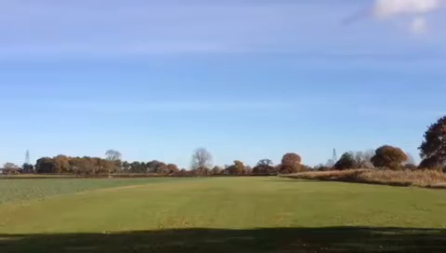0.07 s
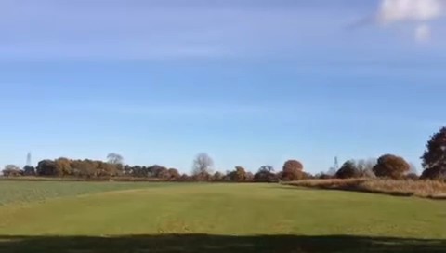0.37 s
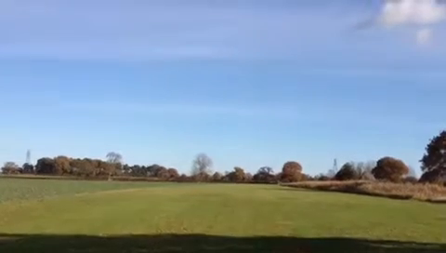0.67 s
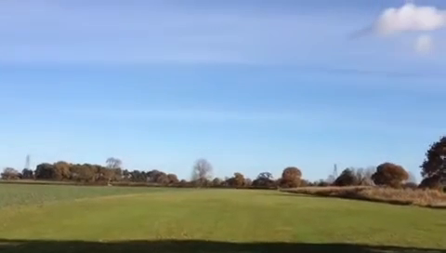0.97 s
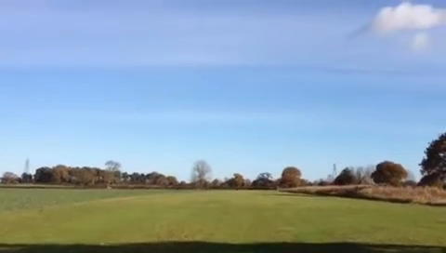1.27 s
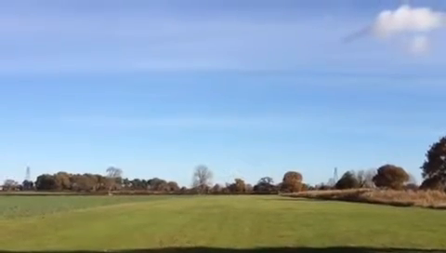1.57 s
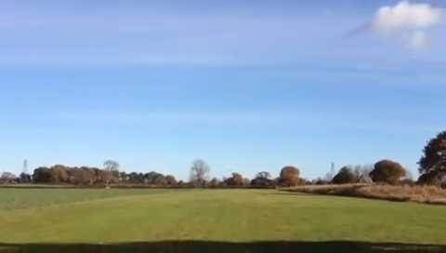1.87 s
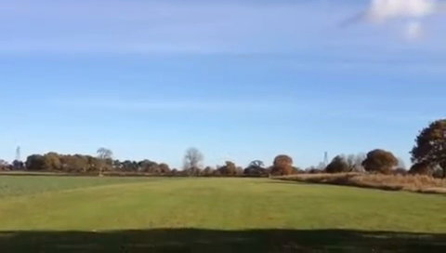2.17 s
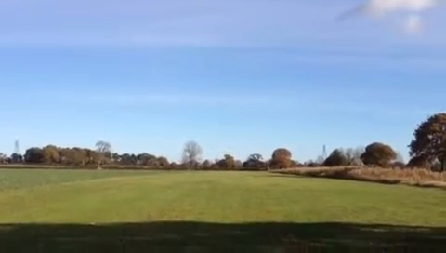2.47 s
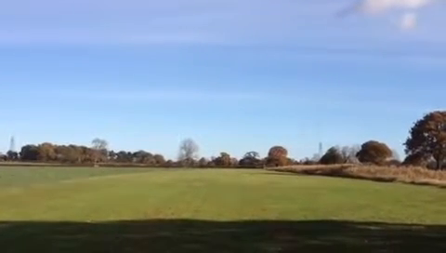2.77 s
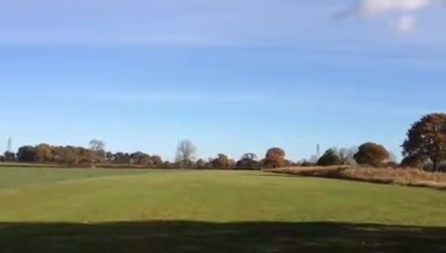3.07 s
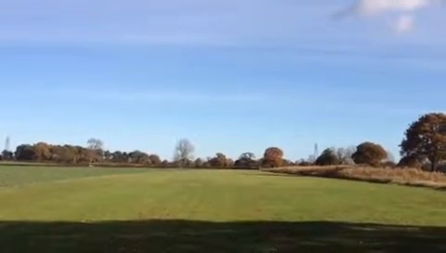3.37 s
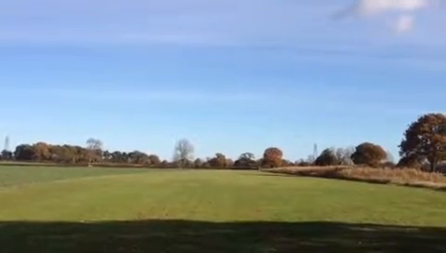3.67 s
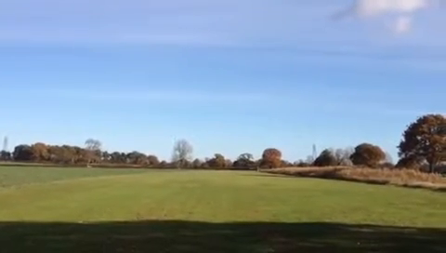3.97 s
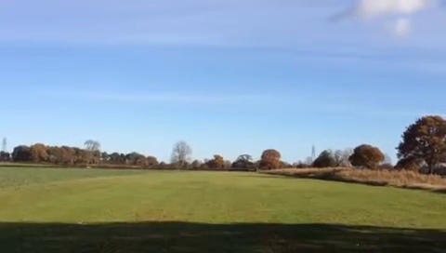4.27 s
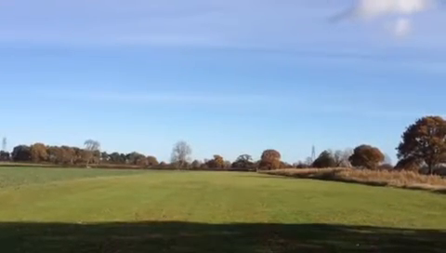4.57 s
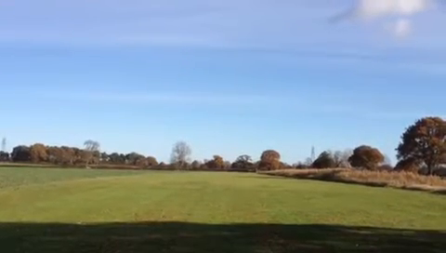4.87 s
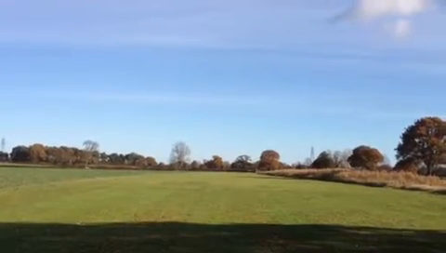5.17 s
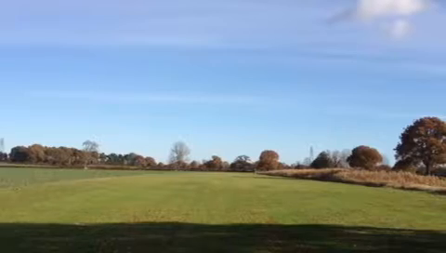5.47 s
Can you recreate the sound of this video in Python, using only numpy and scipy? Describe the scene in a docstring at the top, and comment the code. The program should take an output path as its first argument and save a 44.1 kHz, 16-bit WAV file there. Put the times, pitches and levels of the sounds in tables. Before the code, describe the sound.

A soft whoosh of air, a bright hiss over a lower rush, swells close by and peaks at about 0.5 seconds, just after a faint thin whistle. As it fades, wind starts striking the microphone with a low, sputtering rumble and irregular thumps. The buffeting is the loudest sound, strongest from 1.2 to 1.5 seconds, and carries on in uneven gusts until about 3.3 seconds. After a lull, another gust comes from 3.9 to 4.4 seconds, then only small puffs near 5 and 5.4 seconds.

Behind this, distant tyre noise fades across the open field over the first two seconds and builds again to a peak near 5.4 seconds. A few tiny handling ticks fall between 0.9 and 3 seconds. Very faint breezy whistles come around 2.3 and 4.2 seconds, the latter with a slight rustle of dry leaves. A quiet, steady microphone hiss lies underneath.

```python
"""Whoosh over a windy field

A soft whoosh of air swells close by and fades, perhaps a model glider going past. Gusts rumble on the
microphone and their eddies strike it in low thumps. Far off, tyre roar dies away and builds again.
Thin whistles, rustling leaves, faint handling ticks and the microphone's own hiss lie underneath."""
import sys
import numpy as np
from scipy import signal
from scipy.fft import rfft, irfft
from scipy.io import wavfile
from scipy.ndimage import uniform_filter1d, map_coordinates

SR = 44100
rng = np.random.default_rng(int(sys.argv[2]) if len(sys.argv) > 2 else 0)


def persist_wave(psi):
    """Save psi, clipped to +-1, as 16-bit WAV."""
    counts = np.round(np.clip(psi, -1, 1) * 32767).astype(np.int16)
    wavfile.write(sys.argv[1], SR, np.atleast_2d(counts).T)


N = 243873
TIME = np.arange(N) / SR


def undb(db):
    """Decibels to gain."""
    return 10 ** (np.asarray(db) / 20)


def unit(x):
    """Scale to rms 1."""
    return x / np.sqrt(np.mean(x ** 2))


def noise(spectrum):
    """Noise of rms 1 with the colour of (Hz, dB) points."""
    hz, db = np.transpose(spectrum)
    f = np.maximum(np.arange(N // 2 + 1) * SR / N, 1)
    # the spectrum falls away beyond its first and last points
    skirts = np.minimum(f / hz[0], 1) ** 2 * np.minimum(hz[-1] / f, 1) ** 2
    tilt = undb(np.interp(np.log(f), np.log(hz), db))
    return unit(irfft(rfft(rng.standard_normal(N)) * skirts * tilt, N))


def wavering_gain(depth_db, rate_hz):
    """An unsteady level: random steps, smoothed twice."""
    hold = int(SR / rate_hz)
    steps = np.repeat(rng.standard_normal(N // hold + 1), hold)
    slewed = uniform_filter1d(uniform_filter1d(steps, hold), hold)
    return undb(depth_db * unit(slewed[:N]))


def airy_band(hz, width_hz):
    """A hollow, breathy band: a tone spread by its wandering level and phase."""
    slew = signal.butter(2, width_hz / 2, fs=SR, output="sos")
    wander = signal.sosfilt(slew, rng.standard_normal(N) + 1j * rng.standard_normal(N))
    return unit(np.real(wander * np.exp(2j * np.pi * hz * TIME)))


def passing(closest_s, db, approach_s, retreat_s, power):
    """Gain of something going by in a straight line: it falls with a power of the distance."""
    along = (TIME - closest_s) / np.where(TIME < closest_s, approach_s, retreat_s)
    return undb(db) / np.hypot(1, along) ** power


def swells(rows):
    """Airy bands that each rise and fade once."""
    return sum(airy_band(hz, width) * passing(s, db, half, half, power=1.7)
               for s, db, half, hz, width in rows)


def add(out, sound, s):
    """Mix a short sound in from time s."""
    i = max(int(s * SR), 0)
    out[i:i + len(sound)] += sound[:N - i]


def whoosh():
    """Turbulent air off the wings: a bright hiss peaks just ahead of a lower rush."""
    # colours of the two layers: freq_hz, relative_db
    hiss_colour = [(2500, -31), (4000, -19), (5300, -7), (6600, -3.5), (8100, -3), (8900, -3), (9700, -8),
                   (12000, -8), (14000, -10), (15500, -15)]
    rush_colour = [(200, 12.5), (500, -7.5), (1200, 4), (1800, -1), (2500, 1), (3100, -2.5), (3700, -3.5),
                   (4500, -1), (5200, -7.5), (7000, -60)]
    # their close pass: loudest_s, level_db, approach_s, retreat_s, distance_power
    air_paths = [(.43, -54.5, 0.15, 0.24, 2.34), (.48, -53, 0.33, 0.47, 5.56)]
    air = noise(hiss_colour) * passing(*air_paths[0]) + noise(rush_colour) * passing(*air_paths[1])
    return air * wavering_gain(depth_db=0.95, rate_hz=91)


def airflow(attack_s=0.011, release_s=0.016, breeze_db=-66, breeze_rise_s=0.55):
    """Wind envelope: each gust arrives fast, holds and dies away into the breeze."""
    # gusts over the microphone: start_s, length_s, level_db
    gust_rows = [(0.392, 0.05, -53), (0.501, 0.16, -50), (0.685, 0.11, -43), (1.045, .05, -51.5),
                 (1.169, .31, -40), (1.499, 0.12, -42), (1.674, 0.16, -45), (1.869, .11, -44.5),
                 (2.012, 0.23, -47.5), (2.272, 0.032, -42.5), (2.362, 0.068, -48), (2.479, 0.15, -52),
                 (2.672, 0.32, -43), (3.028, 0.25, -44.5), (3.282, 0.075, -56.5), (3.907, .2, -44.5),
                 (4.147, 0.25, -47), (4.585, 0.25, -59), (4.944, 0.075, -50), (5.365, 0.049, -48.5),
                 (5.484, .05, -55.5)]
    power = (undb(breeze_db) * np.minimum(TIME / breeze_rise_s, 1) ** 2) ** 2
    for start, length, db in gust_rows:
        age = TIME - start
        attack = np.clip(1 + age / attack_s, 0, 1)
        release = np.exp(-np.maximum(age - length, 0) / release_s)
        power += (attack * release * undb(db)) ** 2
    return np.sqrt(power)


def eddies(flow, per_s=24, over_db=6, scatter_db=2, centre_hz=202.3, scatter_octaves=0.52):
    """Irregular lesser eddies that follow the airflow, as rows of time_s, level_db, pitch_hz."""
    count = 400
    early, strength, pitch = rng.uniform(-0.986, 1, (count, 3)).T
    s = (np.arange(count) + 1 + early / 2) / per_s
    flow_db = 20 * np.log10(np.interp(s, TIME, flow) + 1e-9)
    db = flow_db + over_db + scatter_db * strength
    hz = centre_hz * 2 ** (scatter_octaves * pitch)
    return np.column_stack([s, db, hz])[s < TIME[-1]]


def buffets(rows, sharpness=11.0, steepening=2.6):
    """Thumps: each eddy sweeps the port as one pressure swing; smaller ones pass faster, sound higher."""
    out, size = np.zeros(N), 4096
    f = np.arange(size) * SR / size
    for (s, db, hz), angle in zip(rows, rng.uniform(0, 2 * np.pi, size=500)):
        # the microphone's bass cut sets the low side, the eddy's size the fall above
        ratio = f / hz * (sharpness + 1) / sharpness
        spectrum = (ratio * np.exp(1 - ratio)) ** sharpness
        swing = np.fft.fftshift(np.fft.ifft(spectrum))
        # push or suction comes first, depending on where the eddy strikes
        swing = swing / np.abs(swing).max() * np.exp(1j * angle) * undb(db)
        # pressure goes with air speed squared, so strong eddies have steeper fronts
        add(out, np.real(swing + steepening * swing ** 2), s - size / 2 / SR)
    return out


def wind_on_microphone(bass_cut_hz=71.5):
    """Small eddies make a sputtering rumble, larger ones thump; the microphone's bass cut thins both."""
    # colour of the rumble: freq_hz, relative_db
    rumble_colour = [(25, 1), (45, -14.5), (70, -8.5), (110, 0.5), (170, 1.5), (230, -8.5), (320, -14),
                     (430, -21), (650, -31.5), (1200, -46)]
    # strongest eddies hitting the port: time_s, level_db, pitch_hz
    big_eddies = [(.434, -33.5, 216), (.444, -31, 190), (.617, -26.5, 288), (.73, -30, 244),
                  (.778, -34, 286), (1.173, -26, 159), (1.219, -31.5, 220), (1.241, -22, 216),
                  (1.254, -21.5, 270), (1.3, -28, 168), (1.36, -28.5, 203), (1.442, -24, 161),
                  (1.461, -24, 212), (1.559, -32.5, 205), (1.783, -34.5, 251), (1.811, -32.5, 184),
                  (1.895, -30.5, 182), (1.983, -26, 209), (2.304, -35.5, 219), (2.395, -27.5, 198),
                  (2.679, -32.5, 223), (2.725, -27.5, 167), (2.83, -30.5, 172), (2.904, -29, 160),
                  (2.983, -31.5, 218), (3.183, -27.5, 238), (3.2, -29.5, 190), (3.253, -32, 198),
                  (3.913, -32, 167), (3.974, -31, 190), (4.032, -30, 195), (4.087, -34, 200),
                  (4.335, -36, 233), (5.394, -37, 220)]
    flow = airflow()
    rumble = unit(noise(rumble_colour) * wavering_gain(depth_db=3, rate_hz=70)) * flow * undb(-2)
    thumps = buffets(big_eddies) + buffets(eddies(flow))
    bass_cut = signal.butter(2, bass_cut_hz, "high", fs=SR, output="sos")
    return signal.sosfiltfilt(bass_cut, rumble + thumps)


def road(start_doppler=1.02, doppler_drop=0.085, drop_s=1.1):
    """Tyre roar of three far cars, wavering in the moving air; the leaving one sinks in pitch."""
    # tyre colours after crossing the grass: freq_hz, relative_db
    leaving_colour = [(60, -35), (190, -9.5), (340, -12.5), (580, 1), (830, -3), (1060, 3), (1260, -11),
                      (1440, -7.5), (1620, -13), (2050, -9.5), (2400, -8), (3100, -13.5), (4600, -22.5),
                      (9000, -45)]
    coming_colour = [(60, -10), (180, -8), (400, -7), (580, -0.5), (780, -6), (1060, -0.5), (1300, -0.5),
                     (1500, -3), (1750, -28), (2000, -22.5), (2400, -17.5), (2900, -23), (4300, -23.5),
                     (5300, -32), (9000, -42.5)]
    # bands that sing in the roar: pitch_hz, width_hz, relative_db
    leaving_bands = [(1213, 111, -3.5)]
    coming_bands = [(1057, 180, -4.5), (1559, 480, -13.5), (3260, 130, -20.5), (3676, 120, -26),
                    (4320, 73, -29.5)]
    # cars leaving, going by and coming: loudest_s, level_db, approach_s, retreat_s, distance_power
    car_paths = [(.25, -56, 1.2, 1.745, 3.97), (1.85, -62.5, 0.58, 0.85, 1.64),
                 (5.44, -53.5, 0.37, 0.58, 1.24)]
    doppler = start_doppler - doppler_drop * np.tanh(TIME / drop_s)
    leaving = noise(leaving_colour) + singing(leaving_bands)
    leaving = map_coordinates(leaving, [np.cumsum(doppler)], order=3, mode="wrap")
    going_by = noise(coming_colour)
    coming = noise(coming_colour) + singing(coming_bands)
    return sum(roar * passing(*path) * wavering_gain(depth_db=1.01, rate_hz=18)
               for roar, path in zip([leaving, going_by, coming], car_paths))


def singing(bands):
    """The hollow notes in a car's tyre roar."""
    return sum(undb(db) * airy_band(hz, width) for hz, width, db in bands)


def thin_whistles():
    """Breezy whistles, the first just ahead of the whoosh."""
    # narrow swells: loudest_s, level_db, half_length_s, pitch_hz, width_hz
    whistle_rows = [(.19, -62.5, 0.15, 2343, 170), (2.2, -77, 0.56, 2130, 180),
                    (2.25, -82.5, .5, 4450, 200), (2.4, -81.5, 0.59, 3710, 190),
                    (4.2, -80, 0.76, 2530, 280), (4.33, -82, 0.16, 4420, 220)]
    return swells(whistle_rows)


def leaf_rustle():
    """Dry leaves stirred by a gust."""
    # broad, bright swells: loudest_s, level_db, half_length_s, centre_hz, width_hz
    rustle_rows = [(4.28, -74.5, 0.33, 3730, 2376), (4.29, -80.5, .15, 8070, 4500)]
    return swells(rustle_rows)


def handling_ticks(trim_db=-5, snap_db=-8, snap_t60_s=0.016):
    """Tiny dry contacts of a hand: a broad snap and a ring of the casing, gone in milliseconds."""
    # touches on the casing: start_s, relative_db, low_hz, high_hz, t60_s
    touches = [(0.861, -47.5, 3000, 9000, 0.016), (.889, -49, 2780, 7000, 0.019),
               (.990, -48.5, 5000, 10000, 0.014), (1.46, -47, 4560, 8900, 0.0083),
               (1.933, -49, 2000, 5960, 0.021), (1.951, -54.5, 7000, 10900, 0.02),
               (1.96, -45, 5450, 7700, 0.013), (1.963, -53, 2030, 2980, 0.041),
               (2.875, -51, 5000, 14900, 0.0047), (2.945, -47, 7100, 13700, 0.012)]
    out, t = np.zeros(N), TIME[:SR // 10]
    for s, db, low_hz, high_hz, t60 in touches:
        band = signal.butter(4, [low_hz, high_hz], "band", fs=SR, output="sos")
        ring = unit(signal.sosfilt(band, rng.standard_normal(len(t)))) * undb(-60 * t / t60)
        snap = undb(snap_db) * rng.standard_normal(len(t)) * undb(-60 * t / snap_t60_s)
        add(out, undb(db + trim_db) * (ring + snap), s)
    return out


def microphone_hiss(level_db=-70.5):
    """A steady bed of the microphone's own noise."""
    # colour of the hiss: freq_hz, relative_db
    floor_colour = [(40, 7), (150, 3), (500, 9.5), (2000, 3), (4000, 1.5), (5300, -0.5), (8000, -1.5),
                    (10000, -8), (12000, -4.5), (14000, -1.5), (15500, -3.5)]
    return undb(level_db) * noise(floor_colour)


def scene():
    """All the layers meet at one microphone, in mono."""
    foreground = wind_on_microphone() + whoosh()
    background = road() + thin_whistles() + leaf_rustle() + handling_ticks() + microphone_hiss()
    return (foreground + background)[None]


def record(dry):
    """The sound cuts in after a moment of silence; the top end is rolled off steeply."""
    start_s, top_hz = 0.12, 15350
    high_cut = signal.ellip(10, 0.2, 70, top_hz, fs=SR, output="sos")
    return signal.sosfilt(high_cut, dry * (TIME >= start_s))


dry = scene()
out = record(dry)
persist_wave(out)
```